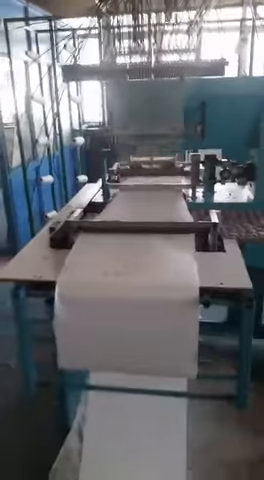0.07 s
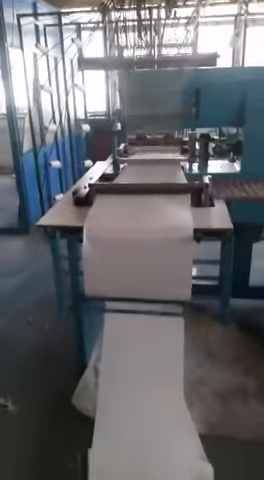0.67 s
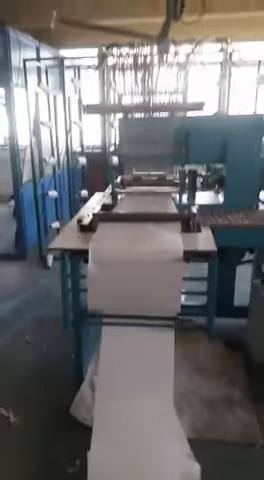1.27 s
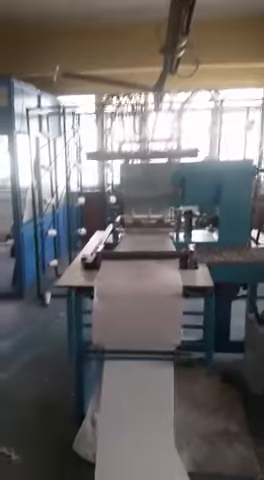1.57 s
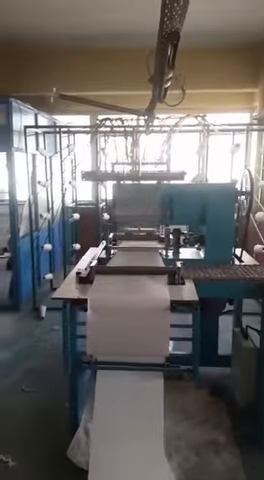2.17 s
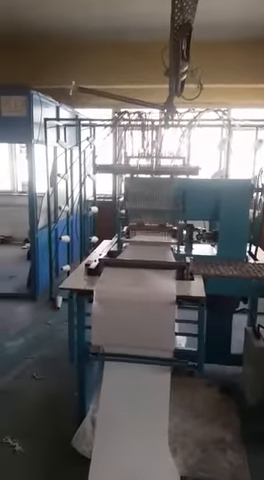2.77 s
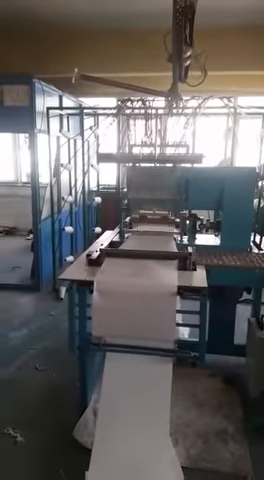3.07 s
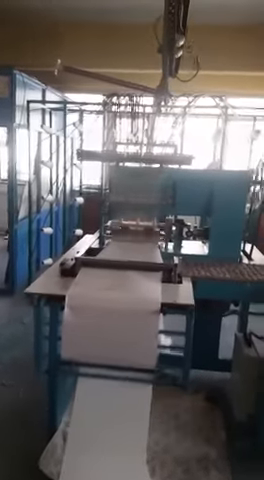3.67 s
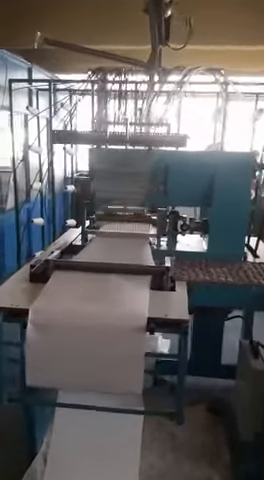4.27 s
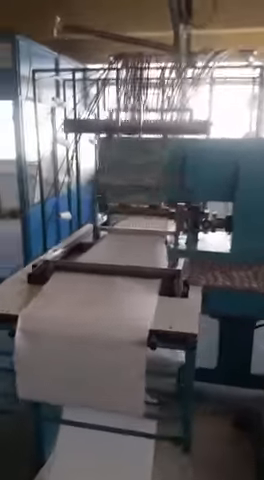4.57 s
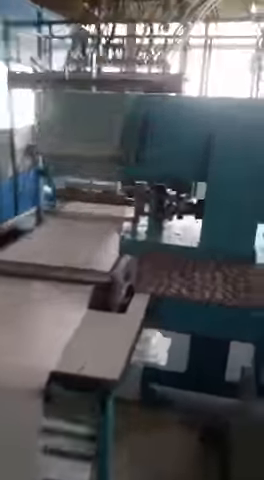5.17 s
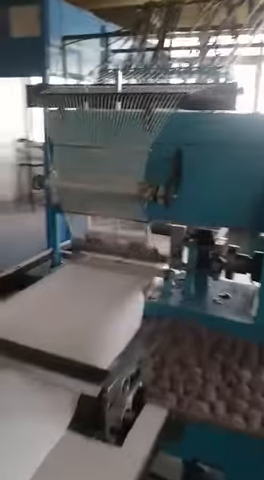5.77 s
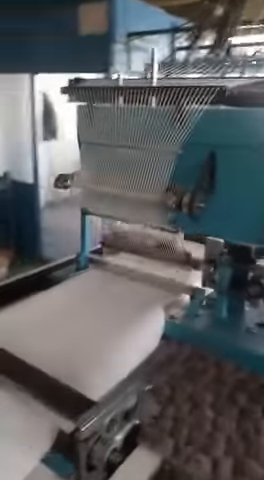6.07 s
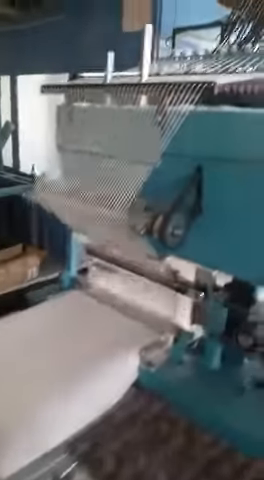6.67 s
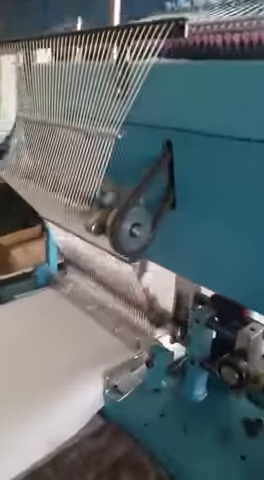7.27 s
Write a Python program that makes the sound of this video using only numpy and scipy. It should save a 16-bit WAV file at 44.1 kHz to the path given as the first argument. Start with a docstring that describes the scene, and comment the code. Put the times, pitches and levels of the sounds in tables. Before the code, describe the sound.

A large tufting machine thuds and clatters nearly three times a second over a loud drone and faint whine, growing closer in a factory hall.

```python
"""Thuds and steel clatter, nearly three times a second: a tufting machine in a hard factory hall.
At each plunge of the needle bar the frame booms, the covers clank and the linkage snaps and rings.
Underneath, the drive drones and its inverter whines. The microphone, muffled on its right port,
first backs away and is then carried right up to the needle head."""
import sys
import numpy as np
from scipy import signal
from scipy.fft import rfft, irfft, next_fast_len
from scipy.io import wavfile
from scipy.ndimage import uniform_filter1d, minimum_filter1d

SR = 44100
rng = np.random.default_rng(int(sys.argv[2]) if len(sys.argv) > 2 else 0)


def int16_out(signal):
    """Quantize to a 16-bit WAV file."""
    q = np.round(np.clip(np.atleast_2d(signal).T, -1, 1) * 32767)
    wavfile.write(sys.argv[1], SR, q.astype(np.int16))


N = 327663
TIME = np.arange(N) / SR
HZ = np.fft.rfftfreq(N, 1 / SR)
SWITCH_HZ, SIDEBAND_HZ = 8005, 70  # the inverter
FIRST_S, PERIOD_S, QUICKEN_S = .2382, .35393, .000076

# needle strokes, one to a turn of the slowly quickening crank: t/s
STROKES = FIRST_S + PERIOD_S * np.arange(-1, 21) - QUICKEN_S * np.cumsum(np.arange(-1, 21))
# steel blows in every stroke: delay/s, clatter level/dB, clack level/dB, clack f/Hz, clack width/Hz
BLOWS = [(-0.044, -12, -6.5, 3780, 544), (-0.018, -10, -24.5, 2100, 1110), (-0.001, -3.5, -2.5, 3114, 290),
         (0.022, -4, 3.5, 1133, 267), (0.081, -6.5, -3, 2970, 815), (0.098, -11, -7, 2825, 800),
         (0.124, -8.5, -11, 2050, 1100), (0.139, -22.5, -12.5, 4610, 1510), (0.238, -15, -11.5, 2530, 626)]
# the microphone's walk: t/s, nearness (0 far off, 1 at the needle head)
WALK = [(0, 0.3), (1.5, 0.03), (3, 0.14), (4.2, 0.15), (5.2, 0.4), (6.2, 0.49), (7.43, 0.97)]


def thuds(level_db=-16, near_db=2.5, rise_s=.05, decay_s=.16, lead_s=.015):
    """Each stroke sets the heavy frame and the hall's low modes booming in nearly the same way."""
    # the frame's boom: f/Hz, relative level/dB
    spectrum = [(30, -17.5), (80, -10.5), (125, 1), (170, -5.5), (225, -2.5), (290, -7.5), (440, -5.5),
                (600, -17.5), (1200, -43), (3000, -92.5)]
    power = np.zeros(N)
    for s in STROKES:
        envelope = burst(np.maximum(TIME - s + lead_s, 0), rise_s, decay_s)
        power += (gain_of(level_db + approach(s, near_db)) * envelope) ** 2
    return radiate(np.sqrt(power) * crank_noise(), spectrum)


def knocks(level_db=-15, near_db=2.5, width_s=.013, jitter_s=.00017, spread_db=.26):
    """The crank knocks through the frame; which knocks carry depends on where the microphone is."""
    # knocks in every stroke: delay/s, f/Hz, distant level/dB, close level/dB
    crank_knocks = [(-.016, 128, -6, -8), (-.003, 227, -20.5, -2), (.033, 226, -2, -8.5),
                    (0.053, 236, -10, -4), (0.055, 139, -3.5, -12.5), (0.072, 176.8, -14.5, -0.5),
                    (.094, 215, -9.5, -4.5), (0.105, 447.4, -5.5, -10), (.113, 232, -7.5, 1),
                    (.126, 163.5, -6.5, -8.5), (.157, 235.4, 0, -11.5), (.183, 227, -12, -5.5),
                    (.205, 330, -6.5, -17.5), (.175, 188, -7.5, -13), (.233, 222, -9, -6.5),
                    (.006, 314, -12.5, -5), (.052, 332, -13.5, -9), (.04, 383.5, -8, -9.5),
                    (.088, 342, -15, -9.5), (.122, 330.4, -19, -7.5), (.162, 137.4, -4.5, -9.5),
                    (.096, 570, -24.5, -8.5), (0.267, 148, -7, -22.5)]
    t, out = np.arange(-SR // 25, SR // 25) / SR, np.zeros((2, N))
    swell = np.exp(-.5 * (t / width_s) ** 2)
    phases = rng.random((len(crank_knocks), 2, 1))  # the same in every stroke
    for s in STROKES:
        near = min(2 * at(WALK, s), 1)
        for (delay, hz, far_db, close_db), phase in zip(crank_knocks, phases):
            late, force, detune = rng.standard_normal(3)
            tone = np.sin(2 * np.pi * (hz * (1 + .02 * detune) * t + phase))
            place_db = approach(s, near_db) + (1 - near) * far_db + near * close_db
            knock = gain_of(level_db + place_db + spread_db * force) * swell * tone
            add(out, s + delay + t[0] + jitter_s * late, knock)
    return out


def clatter(level_db=-15.5, near_db=4, spread_db=.9, contacts_per_s=6000):
    """Rows of needles and loopers land in a quick scatter of contacts that rings the covers."""
    # the rattling covers: f/Hz, relative level/dB
    spectrum = [(100, -29), (350, 1), (600, 1), (1000, 0), (1350, -4.5), (1700, -3.5), (2200, -17.5),
                (3100, -13.5), (4000, -35.5), (5000, -45.5), (7000, -73.5)]
    t, out = np.arange(SR // 5) / SR, np.zeros((2, N))
    envelope = burst(t, rise_s=.00033, decay_s=.032)
    for s in STROKES:
        for delay, db, *_ in BLOWS:
            contacts = rng.standard_normal((2, len(t))) * (rng.random(len(t)) < contacts_per_s / SR)
            size_db = level_db + db + approach(s, near_db) - spread_db * rng.standard_normal()
            add(out, s + delay, gain_of(size_db) * envelope * unit_rms(contacts))
    return radiate(hall(out, wet_db=-2), spectrum)


def clacks(level_db=-8, near_db=.5, spread_db=1.44, tick_db=-17, tick_decay_s=.0074, jitter=.008):
    """Play in the linkage closes with a light steel tick and a short ring, each joint at its pitch."""
    # tone colour of the linkage: f/Hz, relative gain/dB
    spectrum = [(200, -24.5), (900, -27.5), (2000, 16.5), (3300, -3), (4100, -14.5), (5200, -27.5),
                (7000, -37), (9000, -65.5), (15000, -31.5)]
    t, out = np.arange(SR // 12) / SR, np.zeros((2, N))
    envelope = burst(t, rise_s=.0004, decay_s=.0058)
    for s in STROKES:
        for delay, _, db, hz, width in BLOWS:
            noise = rng.standard_normal((2, len(t)))
            late, force = rng.standard_normal(2)
            ring = signal.lfilter(*signal.iirpeak(hz, hz / width, SR), noise) * envelope
            ring /= np.linalg.norm(ring, axis=1, keepdims=True)
            # small, high-pitched joints tick hardest
            tick = gain_of(tick_db) * (hz / 3300) ** 2 * noise * np.exp(-t / tick_decay_s)
            size_db = level_db + db + approach(s, near_db) + spread_db * force
            add(out, s + delay * (1 + jitter * late), gain_of(size_db) * (ring + tick))
    return colour(hall(out, wet_db=1.5), read(spectrum, HZ))


def snaps(ring_db=4, crack_db=2.5, split=.055, side_db=-7, bounce_s=.0097, bounce_db=-3.5):
    """A joint slams home and bounces once: a dry crack, and five steel modes that ring on briefly."""
    # hard snaps of the needle bar and its joints: t/s, f/Hz, ring level/dB, crack level/dB
    slams = [(.197, 3670, -35, -37), (0.233, 3430, -35, -27), (0.590, 3210, -35, -30),
             (.900, 3630, -42, -46), (.941, 2090, -18, -39), (1.651, 3233, -33.5, -21),
             (2.014, 2920, -35, -40), (2.316, 3780, -45.5, -42), (2.360, 3210, -27.5, -26.5),
             (2.712, 3500, -39, -33.5), (3.062, 3200, -26.5, -25.5), (3.417, 2130, -25, -28.5),
             (3.428, 2843, -28, -35), (3.772, 3260, -33.5, -25), (4.085, 3580, -39, -37),
             (4.123, 2170, -22, -32.5), (4.477, 2264, -27, -21.5), (4.788, 3830, -44, -40),
             (4.828, 2130, -23, -23), (4.916, 2980, -29, -30.5), (5.144, 3760, -45, -29),
             (5.184, 3550, -38, -24), (5.536, 2340, -24, -19.5), (5.622, 3080, -28, -30),
             (5.663, 1930, -23.5, -24), (5.776, 2420, -30, -28), (5.844, 3290, -37, -28),
             (5.888, 3180, -26, -19.5), (5.974, 2690, -26, -23.5), (6.131, 2280, -27, -26.5),
             (6.24, 3260, -33, -15.5), (6.328, 2700, -29, -18.5), (6.478, 2620, -27.5, -20.5),
             (6.554, 3830, -42, -19.5), (6.595, 3250, -24, -16), (6.676, 2760, -28, -24),
             (6.835, 2340, -22.5, -26.5), (6.904, 3510, -34, -25), (6.948, 3260, -27, -19.5),
             (7.029, 2880, -26, -16.5), (7.076, 1850, -18, -20.5), (7.184, 2720, -25, -22),
             (7.259, 3870, -40, -18.5), (7.303, 3210, -33.5, -13.5), (7.387, 2580, -31, -25)]
    # the crack: f/Hz, relative level/dB
    spectrum = [(300, -16.5), (900, -3.5), (1950, 9.5), (3100, -6), (4000, -22.5), (5200, -30.5),
                (7000, -50.5), (9000, -63), (11500, -48), (15500, -50.5)]
    t, rings, cracks = np.arange(SR // 12) / SR, np.zeros((2, N)), np.zeros((2, N))
    modes = np.linspace(-2, 2, 5)[:, None, None]  # steps either side of the centre pitch
    envelope = burst(t, rise_s=.001, decay_s=.0079, onset_power=2)
    impact = burst(t, rise_s=.00018, decay_s=.0038)
    bounce = burst(np.maximum(t - bounce_s, 0), rise_s=.0002, decay_s=.0038)
    contacts = impact + gain_of(bounce_db) * bounce
    for s, hz, tone_db, tick_db in slams:
        detune, phase = rng.uniform(-.74, .41, modes.shape), rng.random((len(modes), 2, 1))
        pitch = hz * (1 + split * modes * (1 + .5 * detune))
        ring = (gain_of(side_db * abs(modes)) * np.sin(2 * np.pi * (pitch * t + phase))).sum(0)
        add(rings, s, gain_of(ring_db + tone_db) * ring * envelope)
        add(cracks, s, gain_of(crack_db + tick_db) * rng.standard_normal((2, len(t))) * contacts)
    return hall(rings + colour(cracks, read(spectrum, HZ)), wet_db=-11.5)


def clanks(level_db=-1.5, reach_hz=80):
    """A blow on a steel cover starts all its modes; where it lands decides which speak most."""
    # blows on the covers: t/s, favoured f/Hz, relative level/dB
    cover_blows = [(.610, 995, -10), (0.636, 1125, -11), (1.366, 1228, -11.5), (1.670, 1093, -9.5),
                   (2.405, 1115, -10.5), (3.129, 1087, -7.5), (3.483, 896, -11), (4.162, 1295, -12),
                   (4.517, 1100, -5.5), (5.187, 1065, -11), (5.212, 1090, -7), (5.273, 1084, -12.5),
                   (5.542, 1063, -10), (5.893, 1067, -14), (5.973, 1276, -14.5), (6.242, 1140, -8),
                   (6.266, 1260, -9), (6.482, 1000, -10), (6.948, 1266, -9), (7.304, 1170, -9.5),
                   (7.322, 1370, -7), (7.33, 994, -9.5)]
    # modes of the covers: f/Hz
    cover_hz = [670, 903, 1000, 1100.5, 1244, 1324]
    t, out = np.arange(SR // 8) / SR, np.zeros((2, N))
    modes = np.array(cover_hz)[:, None, None]
    envelope = burst(t, rise_s=.0008, decay_s=.014, onset_power=2)
    for s, hz, db in cover_blows:
        weight = 1 / (1 + ((modes - hz) / reach_hz) ** 2)
        partials = np.sin(2 * np.pi * (modes * t + rng.random((len(modes), 2, 1))))
        ring = (weight / np.linalg.norm(weight) * partials).sum(0)
        add(out, s, gain_of(level_db + db) * ring * envelope)
    return hall(out, wet_db=-10)


def frame_rings(level_db=3):
    """After the heaviest knocks, one of two low frame resonances builds and dies as a clear tone."""
    # rings of the frame: t/s, f/Hz, relative level/dB
    rings = [(0.971, 230, -23.5), (3.199, 231.6, -19), (3.79, 236, -17.5), (4.135, 227.5, -18),
             (5.62, 223.6, -20.5), (6.327, 228.6, -8.5), (6.48, 338, -16), (6.675, 221, -18),
             (7.05, 333, -26), (7.195, 345, -19.5)]
    t, out = np.arange(SR // 2) / SR, np.zeros((2, N))
    envelope = burst(t, rise_s=.016, decay_s=.042)
    for s, hz, db in rings:
        tone = np.sin(2 * np.pi * (hz * t + rng.random((2, 1))))
        add(out, s, gain_of(level_db + db) * envelope * tone)
    return out


def drone(level_db=-20.5, near_db=5, waver_db=1, bass_hz=200):
    """Belts, gears and bearings churn; the bass fills the hall evenly, the rest grows close up."""
    # the drive: f/Hz, relative level/dB
    spectrum = [(15, -36), (26, -10), (36, -5), (80, -2), (130, 0.5), (220, 2.5), (300, -6), (550, -5.5),
                (1250, -14.5), (2000, -17), (3100, -27.5), (4000, -44.5), (5000, -57.5), (7000, -84.5)]
    churn = radiate(crank_noise() * gain_of(waver_db * wander(flutter_hz=28)[0].real), spectrum)
    bass = signal.sosfiltfilt(signal.butter(2, bass_hz, fs=SR, output="sos"), churn)
    return gain_of(level_db) * (bass + (churn - bass) * gain_of(approach(TIME, near_db, curve=1.6)))


def hum():
    """The motor and shafts hum at fixed pitches."""
    # their tones: f/Hz, level/dB, flutter/Hz
    lines = [(37.5, -35, 1.6), (126.4, -37.5, 1.7), (334.4, -39, 8.4)]
    return tones(lines, steady=.98)


def boom(level_db=-31, hz=47.1, peak_s=.71, attack_s=.25, hold_s=.87, release_s=.2):
    """A deep tone swells once, holds and fades."""
    t = TIME - peak_s
    envelope = np.clip(1 + t / attack_s, 0, 1) ** 2 * np.exp(-np.maximum(t - hold_s, 0) / release_s)
    return envelope * tones([(hz, level_db, 3)], steady=2.5)


def whine():
    """The inverter's switching tone swells and fades as the microphone moves."""
    # the tone and its sidebands: f/Hz, level/dB, flutter/Hz
    lines = [(SWITCH_HZ - SIDEBAND_HZ, -72, 9), (SWITCH_HZ, -67, 13), (SWITCH_HZ + SIDEBAND_HZ, -73, 10),
             (SWITCH_HZ, -71, 90)]
    # its swell along the walk: t/s, gain/dB
    swell = [(0, -4), (1.9, -4), (2.8, -6), (4.3, -4), (5.6, 0), (7.43, -7)]
    return tones(lines, steady=.18) * gain_of(at(swell, TIME))


def scrapes():
    """Something rubs now and then with a soft, high hiss."""
    # the rubs: t/s, length/s, level/dB
    rubs = [(.32, 0.26, -57), (2.551, 0.29, -57), (4.74, 0.3, -57), (5.902, 0.19, -55)]
    # their hiss: f/Hz, relative level/dB
    spectrum = [(2000, -31.5), (3600, 6), (4400, 3), (5400, -11), (7000, -39)]
    envelope = sum(gain_of(db) * np.sin(np.pi * np.clip((TIME - s) / length, 0, 1))
                   for s, length, db in rubs)
    return envelope * colour(rng.standard_normal((2, N)), read(spectrum, HZ))


def hiss(level_db=-71.5, pulse_db=4.5, near_db=4.5):
    """A faint top hiss lifts with each stroke, more so close to the machine."""
    # the hiss: f/Hz, relative level/dB
    spectrum = [(100, -4), (6000, -3.5), (8500, -28), (10000, -10), (12000, 1.5), (15500, 2.5)]
    lift = sum(burst(np.maximum(TIME - s, 0), rise_s=.004, decay_s=.08) for s in STROKES)
    envelope = gain_of(level_db + (pulse_db + approach(TIME, near_db)) * lift)
    return envelope * colour(rng.standard_normal((2, N)), read(spectrum, HZ))


def crank_noise(repeat_share=.8, top_hz=520, memory_turns=2.2, odd_weight=.55, seam_s=.03):
    """Noise whose lows come round with the crank, alike in nearby turns; the treble is always new."""
    t, turns = np.arange(SR // 2) / SR, np.arange(len(STROKES) + 1)
    apart = turns[:, None] - turns
    blend = np.exp(-.5 * (apart / memory_turns) ** 2) * np.where(apart % 2, odd_weight, 1)
    blend /= np.linalg.norm(blend, axis=1, keepdims=True)
    cycles = np.tensordot(blend, rng.standard_normal((len(turns), 2, len(t))), 1)
    starts = np.append(STROKES, STROKES[-1] + PERIOD_S) - seam_s * 2
    repeating = np.zeros((2, N))
    for s, length, cycle in zip(starts, np.diff(starts), cycles):
        crossfade = np.sqrt(np.clip(np.minimum(t, length + seam_s - t) / seam_s, 0, 1))
        add(repeating, s, cycle * crossfade)
    share = repeat_share / (1 + (HZ / top_hz) ** 4)
    fresh = rng.standard_normal((2, N))
    return irfft(np.sqrt(share) * rfft(repeating) + np.sqrt(1 - share) * rfft(fresh), N)


def radiate(x, spectrum):
    """A source's own spectrum, shaped by the resonances of the machine's body."""
    # resonances of the frame and covers: f/Hz, width/Hz, gain/dB
    body = [(325.5, 15, 6.5), (390, 40, 0), (584, 77, -4), (654, 47, 4.5), (809, 25, -4), (863, 20, 5),
            (1087, 80, 5), (1276, 315, 10), (1670, 150, -4.5), (1848, 66, 4), (2020, 56, 5),
            (2220, 140, -5.5), (2560, 160, 3.5), (3020, 87, 1), (3880, 71, 3)]
    body_db = sum(db / (1 + (2 * (HZ - hz) / width) ** 2) for hz, width, db in body)
    return colour(x, read(spectrum, HZ) + body_db)


def hall(x, wet_db, build_s=.0045):
    """Direct sound plus a diffuse tail; three sets of reflections blend as the microphone moves."""
    # reverberation of the hall: f/Hz, t60/s
    reverb_times = [(100, 0.4), (250, 0.54), (1000, 0.43), (3000, 0.28), (8000, 0.22)]
    hz, t, noise = signal.stft(rng.standard_normal((3, 2, SR * 3 // 4)), SR, nperseg=256)
    decay = gain_of(-60 * t / read(reverb_times, hz)[:, None])
    tails = signal.istft(noise * decay * (1 - np.exp(-t / build_s)), SR, nperseg=256)[1]
    tails /= np.linalg.norm(tails, axis=-1, keepdims=True)
    weights = np.cos(np.pi * (.449 * TIME + np.arange(len(tails))[:, None] / len(tails)))
    wet = sum(signal.fftconvolve(x * w, tail, axes=1)[:, :N] for w, tail in zip(weights, tails))
    return (x + gain_of(wet_db) * wet) / np.sqrt(1 + gain_of(2 * wet_db))


def microphone(x, lag_s=.00019):
    """Both ports share the bass; the right one hears it later and loses most of the midrange."""
    # the right port against the left: f/Hz, loss/dB, likeness (0-1)
    right_port = [(35, 2, 0.92), (130, 3.5, 0.93), (254, 4, 0.85), (510, 10, .78), (815, 12.5, 0.71),
                  (1210, 21.5, 0), (2000, 17.5, 0.01), (3220, 16, 0.1), (4100, 7, 0.03), (5440, -2, 0.1),
                  (8000, 3, 0.06)]
    loss_db, likeness = (read(np.array(right_port)[:, [0, k]], HZ) for k in (1, 2))
    left, other = rfft(x)
    right = likeness * left + np.sqrt(1 - likeness ** 2) * other
    right *= gain_of(-loss_db) * np.exp(-2j * np.pi * HZ * lag_s)
    return irfft(np.array([left, right]), N)


def approach(s, near_db, curve=.9):
    """Decibels gained at time s by standing closer, up to near_db at the needle head."""
    return near_db * at(WALK, s) ** curve


def tones(lines, steady):
    """Tones whose strength and phase flutter among the reflections of the hall."""
    return sum(gain_of(db) * unit_rms(((steady + wander(flutter)) * np.exp(2j * np.pi * hz * TIME)).real)
               for hz, db, flutter in lines)


def wander(flutter_hz):
    """Slow complex random drift of rms one, separate for each port."""
    t = np.arange(0, N / SR + .01, .001)
    f = np.fft.fftfreq(len(t), t[1])
    drift = np.fft.ifft(np.exp(-.5 * (f / flutter_hz) ** 2 + 2j * np.pi * rng.random((2, len(t)))))
    return unit_rms(np.array([np.interp(TIME, t, row) for row in drift]))


def burst(t, rise_s, decay_s, onset_power=1):
    """Envelope of a blow; a higher onset power rounds its start."""
    return (1 - np.exp(-t / rise_s)) ** onset_power * np.exp(-t / decay_s)


def colour(x, db):
    """Filters by a spectrum given on HZ; white noise keeps its power."""
    size = next_fast_len(N + 4096)
    gain = np.interp(np.fft.rfftfreq(size, 1 / SR), HZ, unit_rms(gain_of(db)))
    return irfft(rfft(x, size) * gain, size)[:, :N]


def add(mix, s, sound):
    """Mixes a two-channel sound in at time s."""
    start = round(s * SR)
    sound = sound[:, max(-start, 0):]
    part = mix[:, max(start, 0):][:, :sound.shape[1]]
    part += sound[:, :part.shape[1]]


def read(points, hz):
    """A spectrum's value at hz, on a log-frequency axis."""
    f, value = np.transpose(points)
    return np.interp(np.log(hz + 1), np.log(f + 1), value)


def at(curve, s):
    """A curve's value at time s."""
    return np.interp(s, *np.transpose(curve))


def gain_of(db):
    """Decibels to amplitude."""
    return 10 ** (np.asarray(db) / 20)


def unit_rms(x):
    """Scales to an rms of one."""
    return x / np.sqrt(np.mean(abs(x) ** 2) + 1e-30)


def scene():
    """At the microphone: the strokes in front, the drive under them, faint high sounds behind."""
    strokes = thuds() + knocks() + clatter() + clacks() + snaps() + clanks() + frame_rings()
    drive = drone() + hum() + boom()
    return microphone(strokes + drive + whine() + scrapes() + hiss())


def record(dry, low_cut_hz=30, ceiling=.88, fade_s=.002, top_hz=15760):
    """The recorder cuts the deepest rumble, eases peaks down and limits the band; the sound fades in and out
    over two milliseconds."""
    x = signal.sosfilt(signal.butter(6, low_cut_hz, "highpass", fs=SR, output="sos"), dry)
    limiter_gain = np.minimum(1, ceiling / (abs(x).max(0) + 1e-9))
    x *= uniform_filter1d(minimum_filter1d(limiter_gain, size=400), size=400)
    x *= np.clip(np.minimum(TIME, TIME[-1] - TIME) / fade_s, 0, 1)
    lowpass = signal.firwin(511, top_hz, window=("kaiser", 9), fs=SR)
    return signal.oaconvolve(x, lowpass[None], "same")


dry = scene()
out = record(dry)
int16_out(out)
```